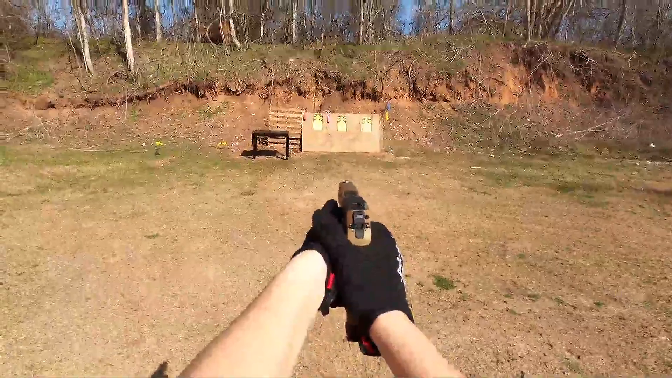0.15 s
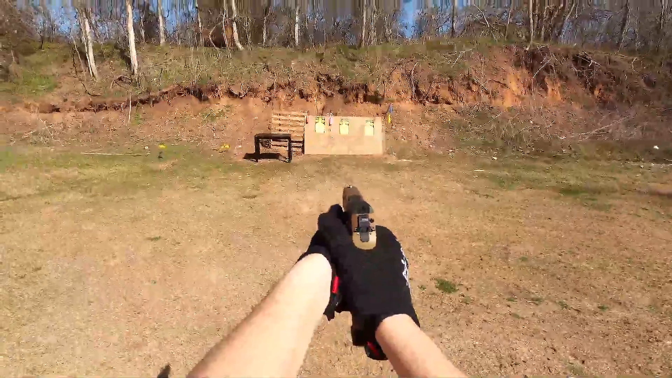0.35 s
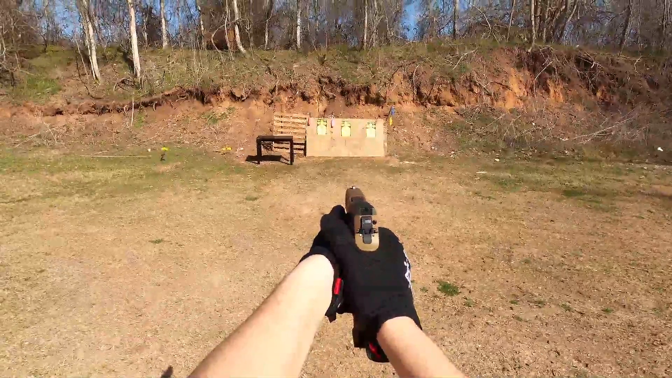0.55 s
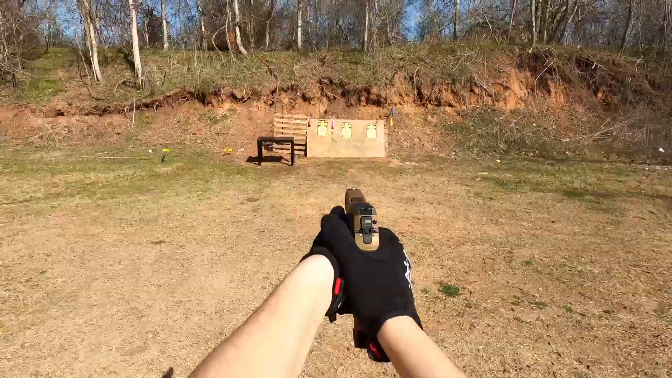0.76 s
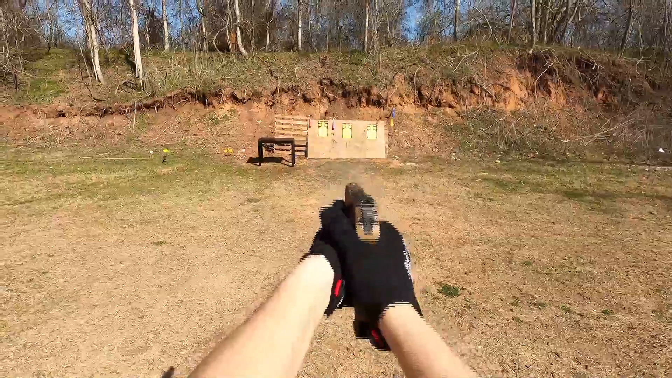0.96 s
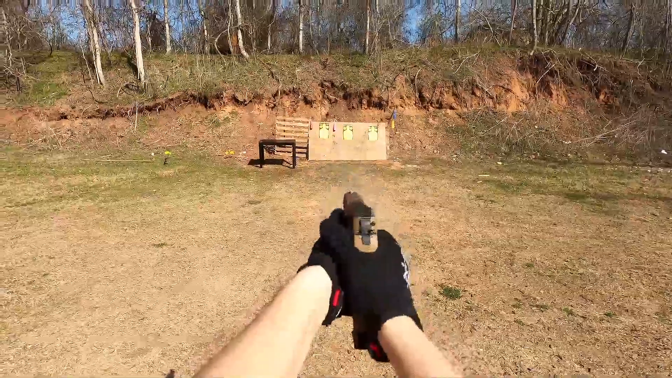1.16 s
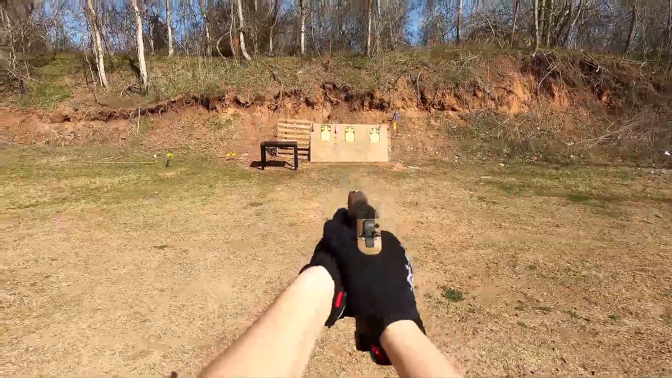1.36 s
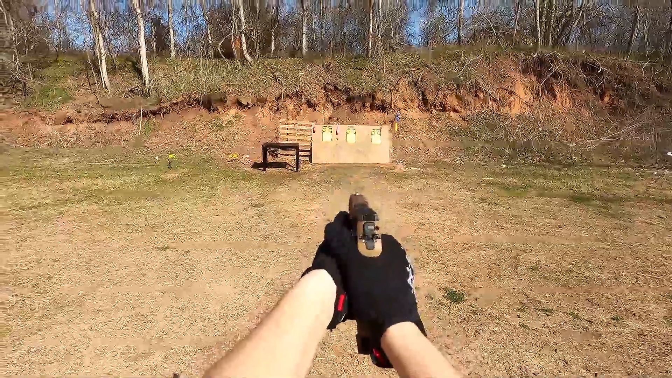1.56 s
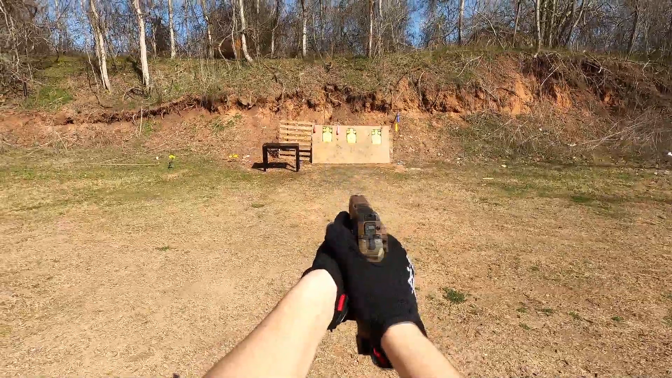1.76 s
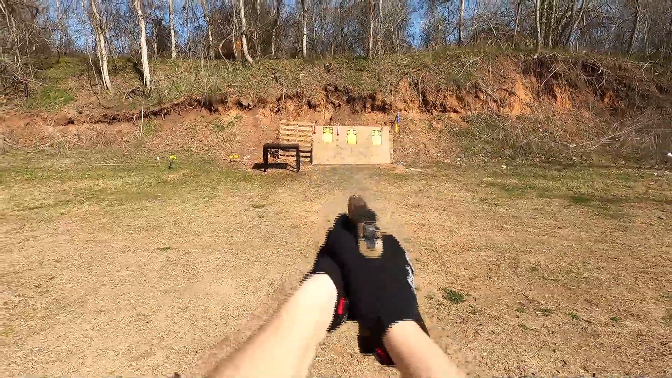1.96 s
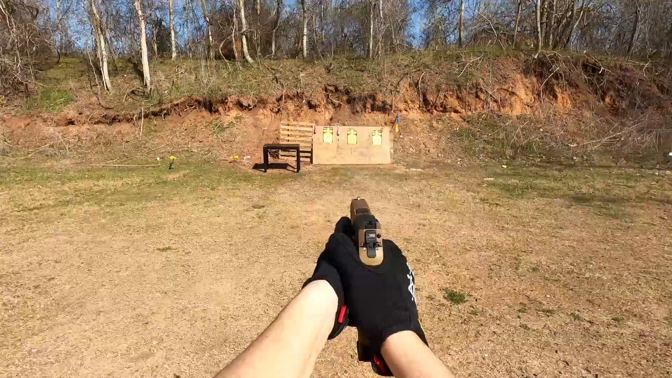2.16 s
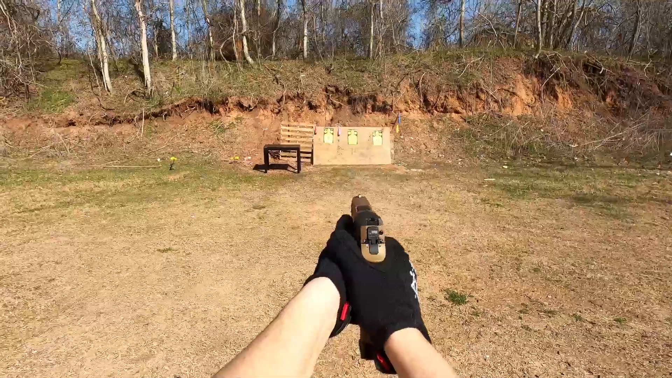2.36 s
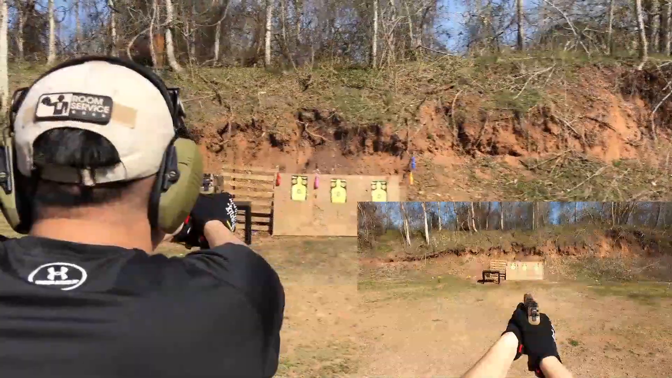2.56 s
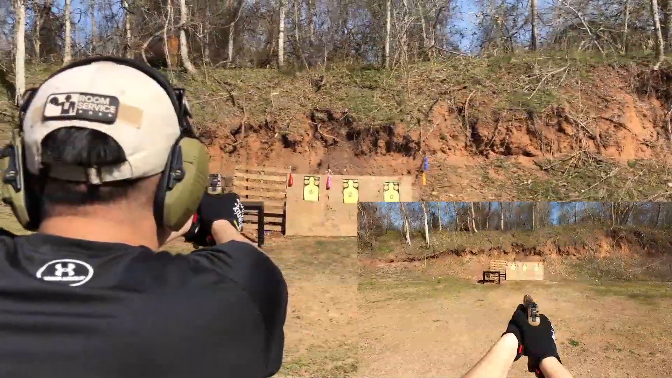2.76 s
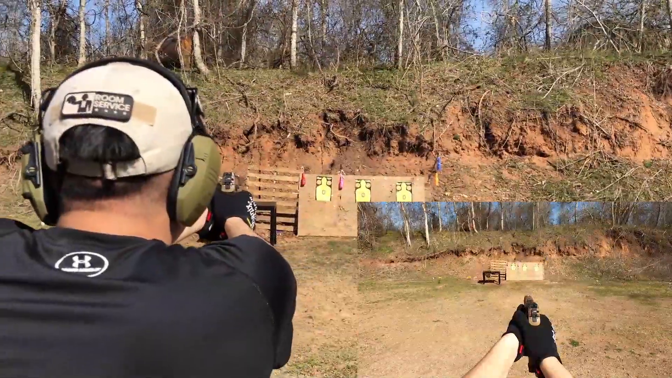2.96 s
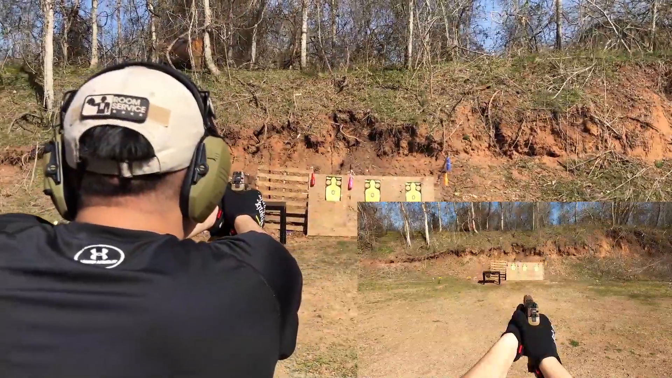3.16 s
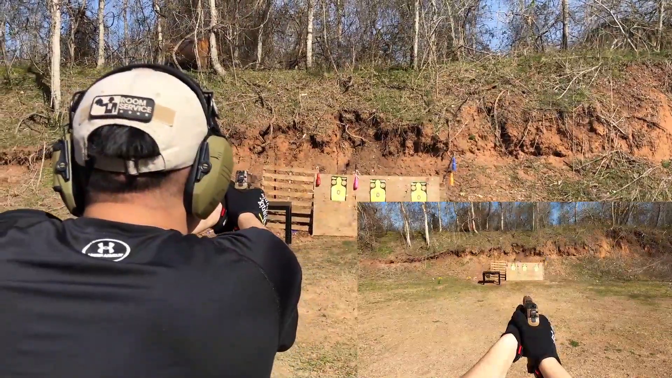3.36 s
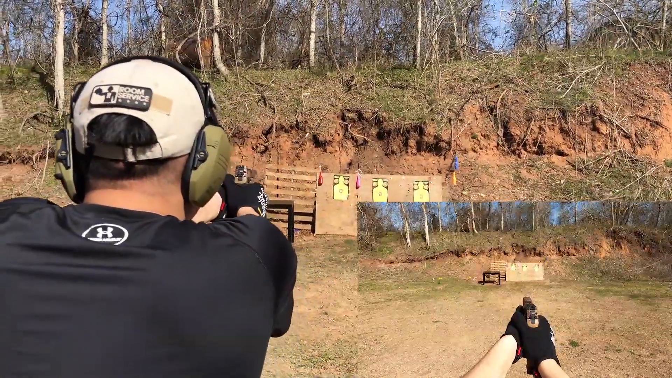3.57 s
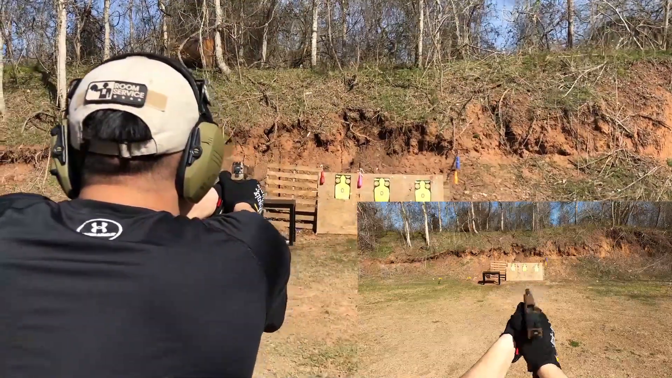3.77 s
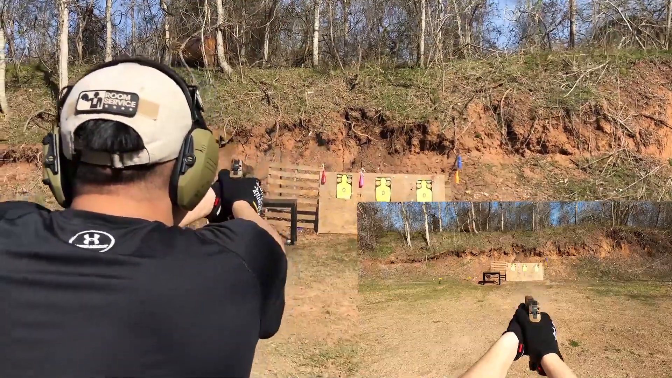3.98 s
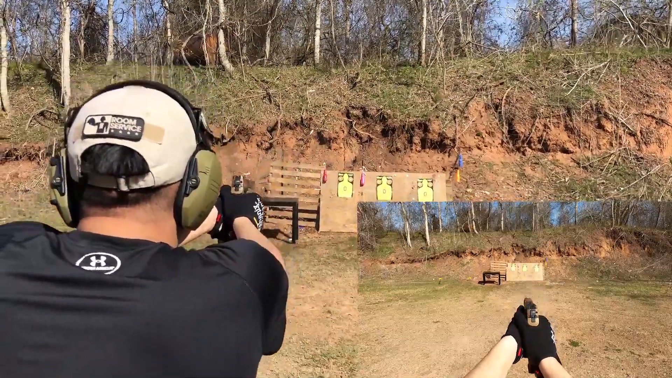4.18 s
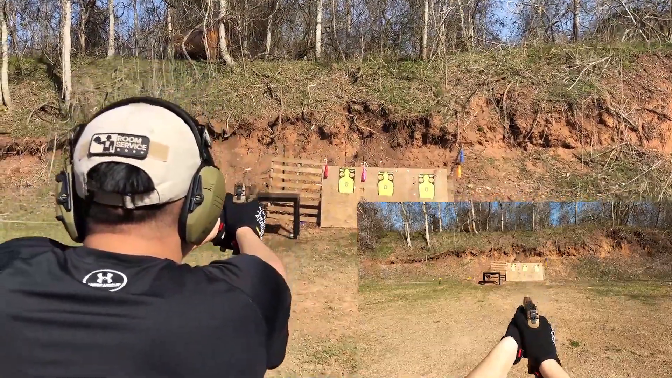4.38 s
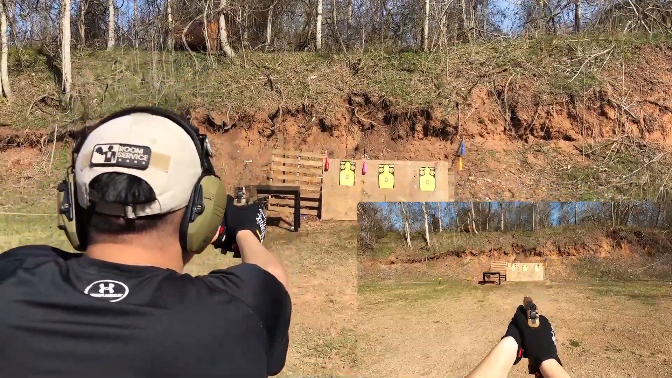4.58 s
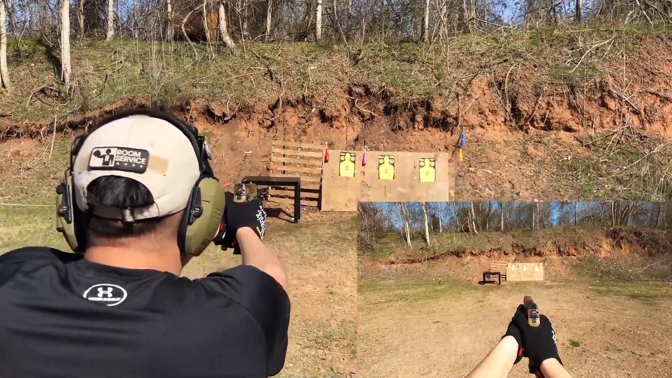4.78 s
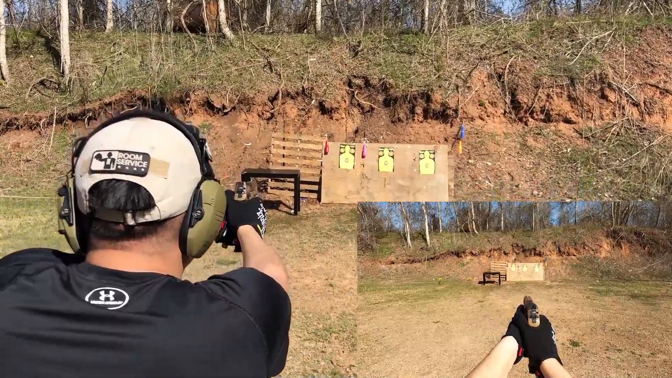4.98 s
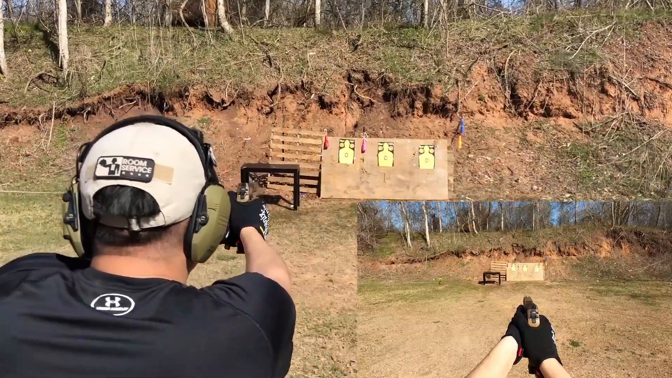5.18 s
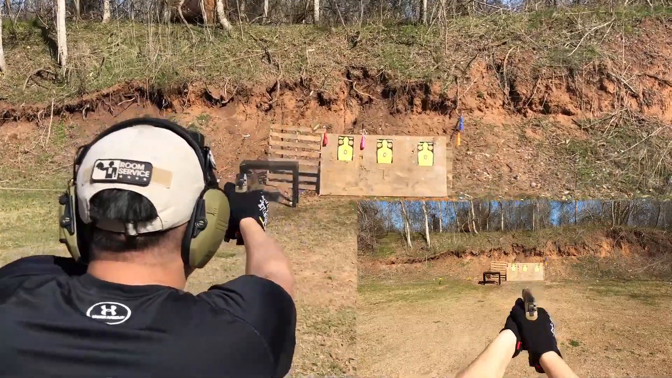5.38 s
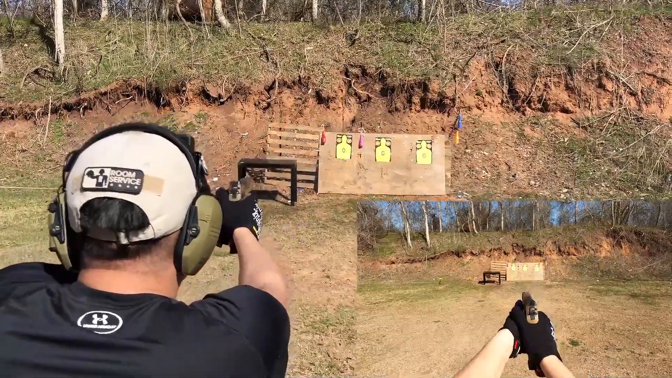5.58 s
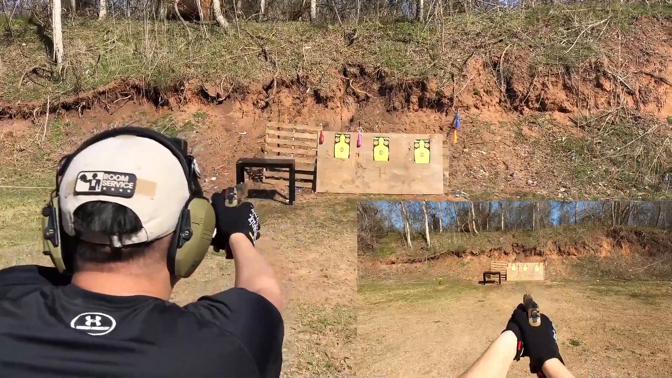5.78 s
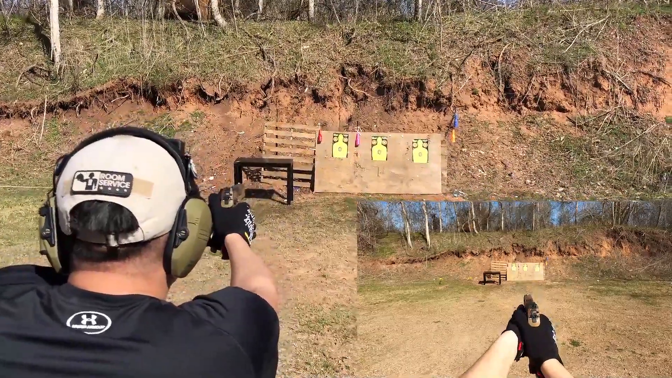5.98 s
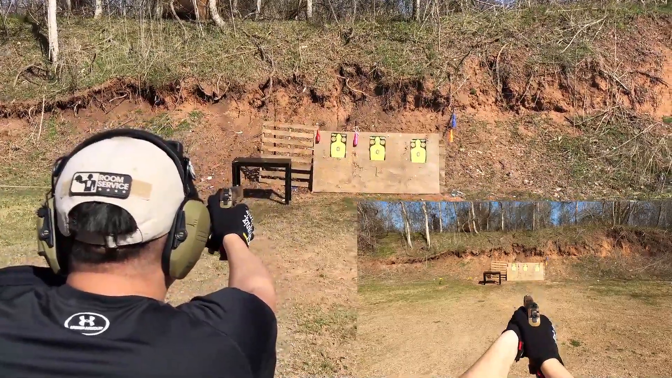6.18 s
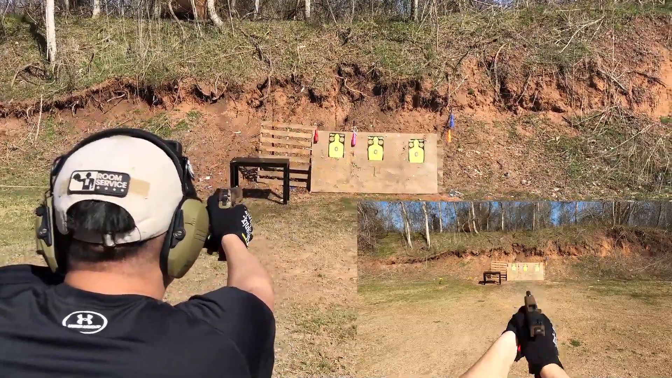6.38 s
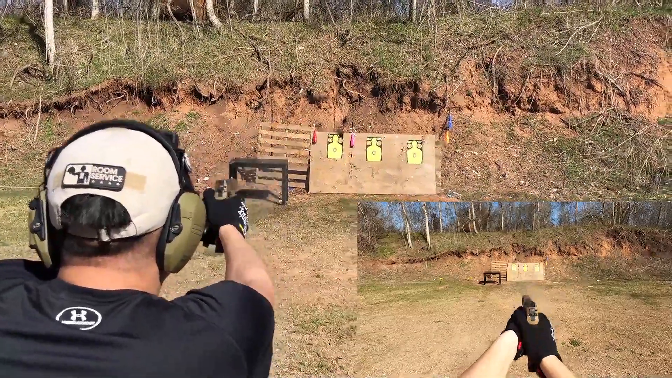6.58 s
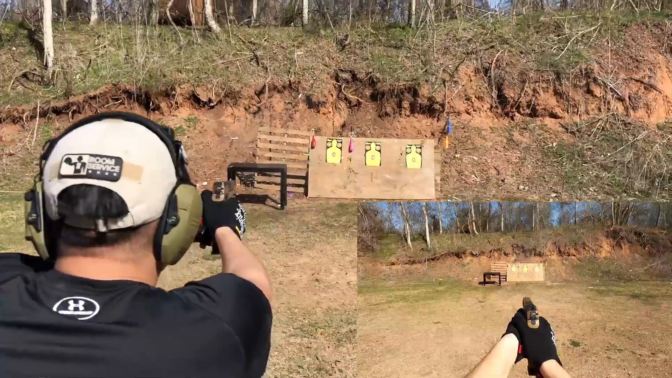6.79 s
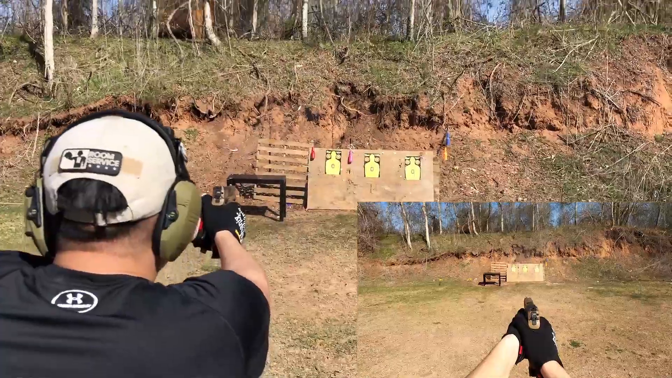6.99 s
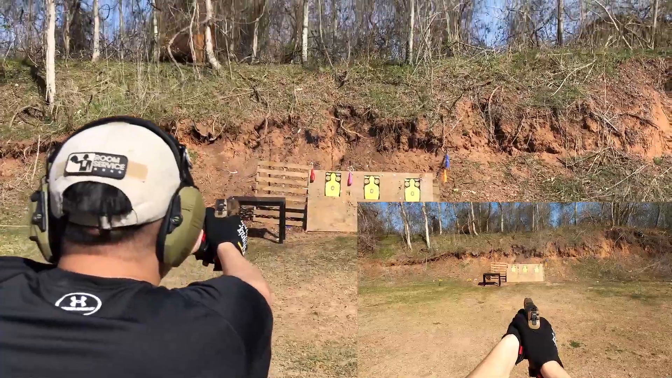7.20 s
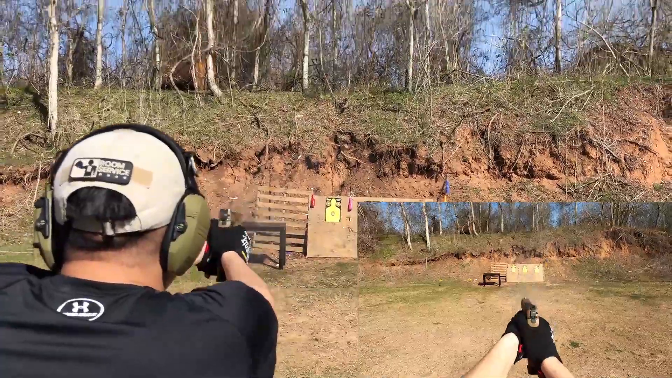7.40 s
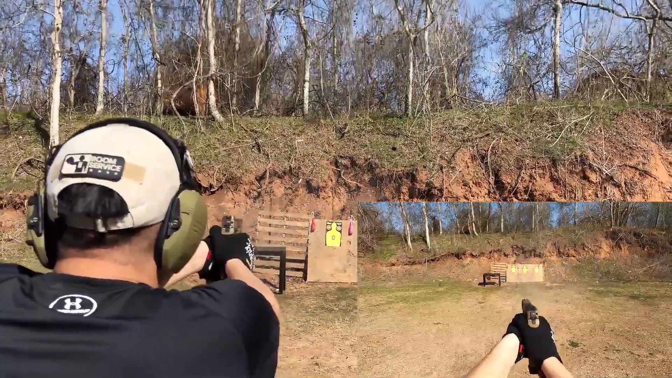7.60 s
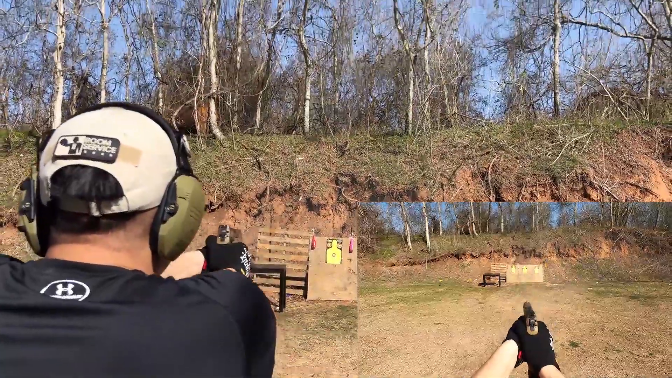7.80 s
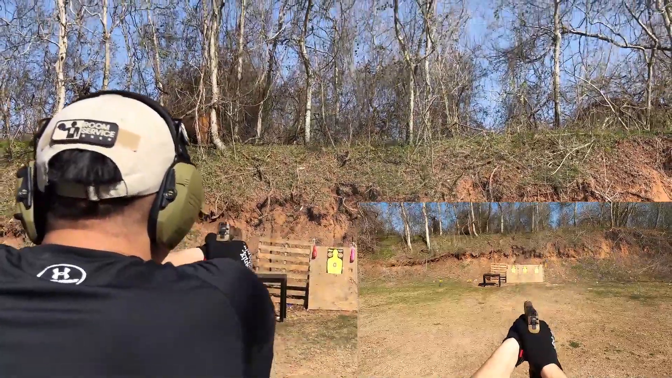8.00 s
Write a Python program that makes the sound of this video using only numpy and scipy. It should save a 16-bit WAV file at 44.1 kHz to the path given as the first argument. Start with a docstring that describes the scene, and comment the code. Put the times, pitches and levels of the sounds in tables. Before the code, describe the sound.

A quiet outdoor range in stereo at the shooter's head: clothes and leaves rustle, small close ticks cluster around 0.35-0.5 s and 0.9 s, with low lumpy wind and very faint throbbing insects. At 1.0 s a pistol fires, a brutally loud, clipped crack and thump with a rough brief swell before it, slapback from an earth bank about 60 ms later, and dense echoes darkening into the woods. A second shot follows at 2.0 s. At 2.5 s a brighter, nearly mono microphone behind joins, adding faint dry-grass hiss and another insect. Shots come at 3.9, 5.3 and 6.5 s, with wind buffets and tiny ticks between. Near 6.0-6.1 s a dull distant shot and a faint, high ringing case are barely heard. Wind swells around 7 s, then two rapid shots at 7.3 and 7.5 s, their echoes fading to the end at about 8 s.

```python
"""Clothes and leaves rustle over wind and insects, small ticks come close by, then a pistol fires seven shots.
The grass range is closed by an earth bank and woods: each shot is swinging pulses, hiss and scattered echoes.
A stereo microphone at the shooter's head hears it all; before the third shot a brighter, nearly mono one
behind him joins, with dry grass and another insect. A distant shot and a ringing case come late.
Wind is lumpy filtered noise, insects are throbbing noise bands; the loudest peaks clip hard."""
import sys
import numpy as np
from scipy import signal
from scipy.fft import rfft, irfft
from scipy.io import wavfile
from scipy.ndimage import uniform_filter1d

SR = 44100
rng = np.random.default_rng(int(sys.argv[2]) if len(sys.argv) > 2 else 0)


def digitize_waveform(pressure):
    """Quantize a signal to 16-bit integers and store it at the path in sys.argv[1].

    Rows of a 2-D input are taken as channels; values are limited to [-1, 1].
    """
    field = np.atleast_2d(pressure).T
    bounded = np.clip(field, -1, 1)
    quanta = np.round(bounded * 32767).astype(np.int16)
    wavfile.write(sys.argv[1], SR, quanta)


N = 355005  # samples

# pistol shots: t/s, head microphone/dB, rear microphone/dB, long tail/dB (added to the rear level),
# head turn (1 favours the right)
SHOTS = [(1.0172, -1, -62.5, 2, 0.12), (2.002, -3, -58.5, -0.5, -0.52), (3.8581, -4, -2.5, 1.5, .6),
         (5.301, -5.5, -1, 2, 0.83), (6.4809, -6, -3, 0.5, .8), (7.343, -4.5, 0.5, -4.5, 0.97),
         (7.5171, -4, -0.5, -1, 0.86)]
MIX_IN_S = 2.511  # the rear microphone joins


def gain_of(db):
    """Turns decibels into a factor."""
    return 10 ** (np.asarray(db) / 20)


def evened(x):
    """Scales to rms 1."""
    return x / np.sqrt(np.mean(x ** 2) + 1e-20)


def read(points, hz, axis=1):
    """Reads a table column on a log-frequency axis."""
    table = np.transpose(points)
    return np.interp(np.log(hz + 1), np.log(table[0] + 1), table[axis])


def curve(rows, t):
    """Joins a table by straight lines in time."""
    return np.interp(t, *np.transpose(rows))


def add(mix, s, sound):
    """Mixes a stereo sound in at a time."""
    part = mix[:, round(s * SR):][:, :sound.shape[-1]]
    part += sound[..., :part.shape[1]]


def coloured(x, points):
    """Filters by a spectrum."""
    size = x.shape[-1]
    gain = gain_of(read(points, np.fft.rfftfreq(size, 1 / SR)))
    return irfft(rfft(x) * gain, size)


def smoothed_twice(size, width):
    """Slow random drift at rms 1: noise through two moving averages."""
    once = uniform_filter1d(rng.standard_normal(size), width)
    return evened(uniform_filter1d(once, width))


def pair(size, alike):
    """Two noise channels with a given likeness, from a shared middle and an opposed side."""
    mid, side = rng.standard_normal((2, size))
    alike = np.clip(alike, 0, 1)
    return np.sqrt((1 + alike) / 2) * mid + np.sqrt((1 - alike) / 2) * side * np.array([[1], [-1]])


def trunks(size, alike, spread_db):
    """Noise in uneven lumps: single trunks and clods answer louder than their neighbours."""
    lumps = evened(uniform_filter1d(rng.standard_normal(size), 90))
    left, right = pair(size, alike)
    side = uniform_filter1d(left - right, size=5)  # the channels differ only below the treble
    stereo = (left + right) / 2 + .6 * side * np.array([[1], [-1]])
    return evened(stereo * gain_of(spread_db * lumps))


def since_shot(t):
    """Seconds since the latest shot, from the second on; 9 before that."""
    return np.min([np.where(t < s, 9, t - s) for s, *_ in SHOTS[1:]], axis=0)


def rustle():
    """Clothes and leaves before the first shot: lumpy noise, filtered and following a level curve."""
    # strength of the rustle: t/s, level/dB
    strength = [(0.0, -50.5), (0.134, -51.5), (0.33, -55.5), (.4, -52), (0.5, -53.5), (.58, -61.5),
                (0.69, -60.5), (0.88, -56)]
    # its spectrum: f/Hz, relative level/dB
    rustle_colour = [(90, -31), (150, -7.5), (250, -8), (450, -13.5), (800, -21.5), (1200, -15.5),
                     (1900, -29), (4300, -40.5), (6500, -46.5), (15000, -61)]
    t = np.arange(N) / SR
    noise = evened(coloured(trunks(N, 1.0, 3.3), rustle_colour))
    return noise * gain_of(curve(strength, t)) * (t < SHOTS[0][0])


def insects():
    """Narrow noise bands throb; two stop at the first shot, the third joins with the rear microphone."""
    # insect bands: f/Hz, width/Hz, throbs per s, depth 0-1, level/dB
    bands = [(8450, 450, 55, .9, -75.5), (9500, 750, 130, .3, -74), (9220, 450, 58, .4, -82)]
    hush_db, hush_s, waver_db = -22, .8, 2  # the third comes back slowly after each shot
    t = np.arange(N) / SR
    before = t < SHOTS[0][0]
    hush = hush_db * np.exp(-since_shot(t) / hush_s)
    rear = gain_of(hush + waver_db * smoothed_twice(N, 5000)) * (t > MIX_IN_S)
    out = np.zeros((2, N))
    for (hz, width, rate, depth, db), heard in zip(bands, [before, before, rear]):
        band = signal.butter(3, [hz - width / 2, hz + width / 2], "band", fs=SR, output="sos")
        throb = 1 + np.clip(depth, 0, 1) * np.cos(2 * np.pi * rate * t)
        out += gain_of(db) * heard * evened(signal.sosfilt(band, pair(N, .8)) * throb)
    return out


def wind():
    """A lumpy low rumble of filtered noise on the microphones, with a few stronger buffets."""
    # spectrum of the gusts: f/Hz, relative level/dB
    gust_colour = [(12, -21.5), (20, 1), (52, -7), (105, -6.5), (150, -17.5), (250, -29.5), (400, -43),
                   (900, -78.5)]
    # slow strength of the wind, before the lumps: t/s, level/dB
    strength = [(0, -59.5), (.35, -54), (.6, -65), (.85, -55.5), (1.7, -58), (2.9, -64.5), (3.6, -57),
                (4.5, -53.5), (4.95, -59), (5.8, -51.5), (6.2, -55), (7.0, -42.5), (7.3, -51), (8.05, -59)]
    # buffets on the microphones: peak t/s, level/dB, length/s
    buffets = [(0.366, -47.5, 0.039), (3.134, -49.5, 0.11), (3.335, -42.5, 0.04), (3.425, -45.5, 0.033),
               (3.74, -50, 0.14), (4.75, -44, 0.079), (5.064, -45, 0.08), (5.168, -44, 0.076),
               (5.24, -50, 0.045), (6.02, -43, 0.049), (6.307, -42.5, 0.073), (7.11, -40.5, 0.13)]
    lump_s, lumps_db = .05, 3.5
    t = np.arange(N) / SR
    lumps = smoothed_twice(N, round(lump_s * SR))
    level = gain_of(curve(strength, t) + lumps_db * lumps)
    level += sum(gain_of(db) * np.exp(-(2 * (t - s) / length) ** 2) for s, db, length in buffets)
    return evened(coloured(pair(N, 0.55), gust_colour)) * level


def tick(db, hz, t60, snap_db):
    """A soft noisy ring and a short wider snap, both resonant noise dying away."""
    t, noise = np.arange(6000) / SR, pair(6000, 0.99)
    narrow = signal.iirpeak(hz, 1.6, SR)
    wide = signal.iirpeak(min(1.8 * hz, 9000), .9, SR)
    ring = evened(signal.lfilter(*narrow, signal.lfilter(*narrow, noise))) * gain_of(-60 * t / t60)
    snap = evened(signal.lfilter(*wide, signal.lfilter(*wide, noise))) * np.exp(-t / 0.0012)
    soft_edge = np.minimum(t / 0.0013, 1)
    return gain_of(db) * (ring + gain_of(snap_db) * snap) * soft_edge


def ticks():
    """Small close ticks: each ring fades 60 dB in 70 swings, and thin ones snap harder."""
    # grip, clothes and small things in the grass: t/s, level/dB, f/Hz
    touches = [(.03, -47, 2100), (.126, -48.5, 1870), (.145, -55, 4000), (.275, -55, 3000),
               (.349, -37, 660), (.356, -38, 260), (.365, -38, 1100), (.378, -43, 1100), (.396, -46, 900),
               (.447, -48, 700), (.465, -50, 1100), (.494, -50, 1200), (.9, -42, 1250), (.922, -44, 450),
               (.927, -37, 1000), (2.511, -59, 4910), (2.915, -67, 4500), (3.276, -65, 6000),
               (3.317, -66, 7000), (3.348, -65, 5000), (3.577, -62, 9500), (4.26, -61, 7960),
               (4.67, -56, 6000), (4.8, -66, 5000), (4.899, -67, 5500), (5.024, -65, 6000),
               (5.144, -44, 2090), (6.094, -57, 5500)]
    ring_cycles = 70
    snap_db, snap_db_per_octave = -13.5, 7  # snap against ring at 1 kHz, and its rise
    out = np.zeros((2, N))
    for s, db, hz in touches:
        snap = snap_db + snap_db_per_octave * np.log2(hz / 1000)
        add(out, s, tick(db, hz, ring_cycles / hz, snap))
    return out


def swell(ring_hz, db, length_ms, tilt_db, ring_db, stutter_db):
    """Noise with uneven narrow peaks and a fuzzy ring grows up to the crack, with four bursts at even steps."""
    stutter_ms, stutter_decay_ms = 10.6, 1.4
    stutter_step_db = -8.5  # each earlier burst is weaker
    size = round(4.3 * stutter_ms * SR / 1000)
    hz = np.fft.rfftfreq(4096, 1 / SR)
    lead = np.arange(size, 0, -1) / SR * 1000  # ms left to the end of the swell
    peaks_db = 4 * evened(uniform_filter1d(rng.standard_normal(len(hz)), 8))
    slope_db = tilt_db * np.log2(1 + hz / 400) - 30 * (hz / 16000) ** 3
    noise = rfft(pair(4096, .93))
    away = (hz - ring_hz) / (30 + 0.05 * ring_hz)
    rough = evened(irfft(noise * gain_of(peaks_db + slope_db)))[:, :size]
    ring = evened(irfft(noise / (1 + away ** 4)))[:, :size]
    grow = np.sin(np.pi / 2 * np.clip(1 - lead / length_ms, 0, 1)) ** 4.1
    bursts = 0
    for k in range(4):  # the last burst first
        age = np.maximum((k + 1) * stutter_ms - lead, 0) / stutter_decay_ms
        bursts = bursts + gain_of(stutter_db + stutter_step_db * k) * np.e * age * np.exp(-age)
    return rough * (gain_of(db) * grow + bursts) + gain_of(ring_db) * ring * grow


def blast(ms, db, crest, growth, rise, decay, wobble):
    """A pressure jump heard as a falling sweep: treble first, each half swing longer than the last, none quite
    even."""
    age = np.maximum(ms, 1e-6)
    swing = np.cos(np.pi * np.log(age / crest) / np.log(growth) + wobble)
    return gain_of(db) * swing * (1 - np.exp(-(age / rise) ** 3)) * np.exp(-(age - rise) / decay)


def arrivals(delays, paths, hiss_colour, alike, turn):
    """The distinct paths of one shot, from 3 ms before it: a swing and a puff of hiss each."""
    size = 8000
    ms = np.arange(size) / SR * 1000 - 3
    hiss = evened(coloured(pair(size, alike), hiss_colour))
    wobble = 0.33 * smoothed_twice(size, 40)  # radians
    out = np.zeros((2, size))
    for at, (db, crest, growth, rise, decay, hiss_db, hiss_ms, right_db) in zip(delays, paths):
        side = turn * right_db * np.array([[-1], [1]])
        puff_age = ms - at - rise / 2 - hiss_ms
        puff = gain_of(hiss_db) * hiss * np.exp(-(puff_age / hiss_ms) ** 4)
        late = .014 * side  # ms: the louder side lags a little
        out += blast(ms - at - late, db + side, crest, growth, rise, decay, wobble) + puff
    return out


def head_arrivals(turn):
    """Blast and reflections reach the head at the delays of their path lengths."""
    # blast, ground, bullet strike, bank edge, bank face, target wall, two booms: t/ms after the shot
    delays = [-2.7, 5.0, 51.5, 58.2, 59.6, 82.6, 80, 112]
    # each path: relative level/dB, time to a crest/ms, growth per half swing (below 1: its inverse), rise/ms,
    # decay/ms, relative hiss/dB, hiss/ms, right gain and left loss at full turn/dB
    paths = [(7.5, 4.9, 1.5, 0.11, 3.1, -2.5, 2, 3), (3, 1.9, 1.8, 1.1, 4.7, -20.5, 1.7, 3.5),
             (-26, 1.3, 0.76, .5, 2.2, -25.5, 8.7, 0), (-8, 1.5, 2, 0.69, 3.8, -16, 0.47, 1.5),
             (4.5, 4.7, 2.1, 0.85, 4.2, -18, 1, 0.5), (-4.5, 4.9, 2.5, 6.9, 2.1, -24, 0.87, 1),
             (-11.5, 26, 1.09, 5.8, 18, -33, 5.5, -3.5), (-14, 28, 1.5, 4.7, 13, -36.5, 9.3, 3)]
    # colour of the hiss: f/Hz, relative level/dB
    hiss_colour = [(200, -2.5), (1500, 8.5), (4000, -5), (9000, -18), (16000, -32)]
    return arrivals(delays, paths, hiss_colour, .93, turn)


def rear_arrivals(turn):
    """The same shot farther back: later paths, with the same hiss in both channels."""
    # blast, ground, bullet strike, bank, target wall, far corner: t/ms after the shot
    delays = [13.2, 19.3, 65.5, 74.8, 92, 113]
    # each path: relative level/dB, time to a crest/ms, growth per half swing (below 1: its inverse), rise/ms,
    # decay/ms, relative hiss/dB, hiss/ms, right gain and left loss at full turn/dB
    paths = [(-7.5, 5.2, 1.7, .6, 9, -6.5, 1.6, 0.0015), (-3.5, 1.9, 1.3, 2.4, 1.9, -13.5, 0.82, 0.00024),
             (-13.5, 6.8, 0.76, 3.5, 1, -14, 1.2, 0), (-12, 3.7, 1.5, 1.1, 3.7, -13, 1.1, 0.011),
             (-1.5, 9, 1.09, 7.7, 3.5, -18, 3.2, 0.029), (-8, 5.7, 1.1, 5.3, 4, -23.5, 4, 0.006)]
    # colour of the crack: f/Hz, relative level/dB
    hiss_colour = [(200, -15), (1500, 0.5), (4000, 4.5), (9000, 0), (16000, -12)]
    return arrivals(delays, paths, hiss_colour, 1.0, turn)


def echo_level(groups, age):
    """Each group of echoes swells in and dies away; their powers add."""
    power = 0
    for s, db, rise, t60 in groups:
        late = np.maximum(age - s, 0)
        level = gain_of(db - 60 * late / t60) * (1 - np.exp(-(late / rise) ** 2))
        power = power + level ** 2
    return np.sqrt(power)


def scatter(source, groups, colour, db, tail_db, power):
    """Dense echoes whose treble and bass fade with the path, in patches; later ones follow the tail level."""
    patchy_db = 1.3
    hz, t, z = signal.stft(source, SR, nperseg=512, noverlap=384)
    start_db = read(colour, hz)[:, None]
    loss_db = read(colour, hz, axis=2)[:, None] * t ** power
    shape = gain_of(start_db - loss_db)
    shape /= np.sqrt(np.mean(shape[:, :1] ** 2) * len(hz) / 32)
    patches = rng.standard_normal(shape.T.shape).T
    patches = evened(uniform_filter1d(uniform_filter1d(patches, 6, 0), 20, 1))
    z = z * shape * gain_of(patchy_db * patches)
    out = signal.istft(z, SR, nperseg=512, noverlap=384)[1][..., :source.shape[-1]]
    age = np.arange(out.shape[-1]) / SR
    late = np.clip(age / 0.37, 0, 1)
    return 3 * out * echo_level(groups, age) * gain_of(db + (tail_db - db) * late)


def head_scatter(source, db, tail_db):
    """Ground and woods answer at the head in overlapping groups of dense echoes."""
    # muzzle smoke and ground, bank, near trees, hillside, far woods:
    # t/s after the shot, relative level/dB, rise/s, t60/s
    groups = [(0.00067, -11.5, 0.0036, 0.082), (.036, -12, .02, 0.19), (.085, -20, .025, .6),
              (.235, -19.5, .06, .7), (.14, -27.5, 0.033, 3.06)]
    # colour of the scatter: f/Hz, relative level at the start/dB, loss against 1 kHz after 1 s/dB
    colour = [(30, -27.5, 10), (100, 6.5, 20), (254, 2.5, 18), (510, -3.5, 0), (1100, -1.5, 4.5),
              (1600, -9.5, 9), (2200, -7.5, 17), (3000, -10.5, 25.5), (4300, -11.5, 43), (6000, -20.5, 50),
              (10100, -24, 88.5), (16000, -39, 117.5)]
    return scatter(source, groups, colour, db, tail_db, power=0.81)


def rear_scatter(source, db, tail_db):
    """Dense echoes at the rear microphone, with their own timing and brighter colour."""
    # groups of echoes: t/s after the shot, relative level/dB, rise/s, t60/s
    groups = [(.016, -10.5, .002, .09), (0.031, -6.5, 0.025, 0.33), (0.1, -6.5, 0.012, 0.34),
              (0.15, -23.5, 0.058, 0.74), (0.14, -32, 0.17, 1.4)]
    # colour of the scatter: f/Hz, relative level at the start/dB, loss against 1 kHz after 1 s/dB
    colour = [(30, -43, 8), (150, -17, 6.5), (395, -6, 6.5), (900, -0.5, 6), (1520, -9, 8),
              (2200, -5.5, 45), (3000, -11, 28), (4340, -11.5, 43.5), (6000, -15, 48), (10200, -15, 79),
              (16000, -23, 108.5)]
    return scatter(source, groups, colour, db, tail_db, power=0.87)


def bank_boom(source, db):
    """A low boom rolls along the bank: half a second of bass-heavy scatter."""
    # groups of echoes: t/s after the shot, relative level/dB, rise/s, t60/s
    groups = [(.062, -11, .025, 0.23), (.15, -47.5, 0.092, 0.2)]
    # colour of the boom: f/Hz, relative level at the start/dB, loss after 1 s/dB
    colour = [(30, -14, 3), (69, -5, 3.7), (139, -0.5, 3), (260, 0, 3.3), (430, 0, 2.1), (700, -28, 3),
              (2000, -67.5, 3)]
    return scatter(source[:, :SR // 2], groups, colour, db, db, power=0.77)


def pistol():
    """Every shot meets the same bank and trees, so most of its scatter at the head repeats."""
    # a rough swell stutters up to each crack: level/dB, length/ms, treble tilt/dB per octave,
    # ring level/dB, last burst level/dB
    swells = [(-8, 49, -2.5, -9.5, -11.5), (-10.5, 37, -4.5, -17, -15), (-13, 44, -5.5, -20, -10),
              (-14, 42, -5.5, -25, -11), (-20.5, 42, -5, -12.5, -16.5), (-25.5, 34.5, -6, -19.5, -22),
              (-24, 26, -2, -20, -20.5)]
    # ring of each swell: f/Hz
    swell_ring_hz = [135, 260, 520, 1300, 920, 900, 900]
    same_site, fresh = .85, .45  # shares of repeated and new scatter at the head
    head_drop_db, rear_lumps_db = -1.5, 3
    out, size = np.zeros((2, N)), round(2.4 * SR)
    head_site, rear_site = trunks(size, 0.98, 1.5), trunks(size, 0.97, rear_lumps_db)
    for (s, head_db, rear_db, tail_db, turn), run_up, ring_hz in zip(SHOTS, swells, swell_ring_hz):
        head = evened(same_site * head_site + fresh * trunks(size, 0.82, 0.85))
        rear = evened(0.58 * rear_site + 0.84 * trunks(size, 1.0, rear_lumps_db))
        add(out, s, head_scatter(head, head_db, tail_db))
        add(out, s, rear_scatter(rear, rear_db, rear_db + tail_db))
        add(out, s, bank_boom(head, head_db))
        near = gain_of(head_db) * head_arrivals(turn)
        behind = gain_of(rear_db) * rear_arrivals(turn)
        add(out, s - .003, near + behind)  # the arrivals start 3 ms early
        rough = swell(ring_hz, *run_up)
        add(out, s - .002 - rough.shape[1] / SR, rough)
        if s == SHOTS[1][0]:  # this tail still sounds, and drops as the rear microphone joins
            out[:, round(MIX_IN_S * SR):] *= gain_of(head_drop_db)
    return out


def grass():
    """Dry grass at the rear microphone: filtered hiss with random crackles that decay exponentially."""
    # spectrum of the grass: f/Hz, relative level/dB
    grass_colour = [(300, -6.5), (1500, -2.5), (5000, -4.5), (9000, -7.5), (15000, -19)]
    grass_db, crackles_per_s, crackle_db = -74.5, 21, -81.5
    hush_db, hush_s = -18.5, .5  # the hiss comes back slowly after each shot
    t = np.arange(N) / SR
    sizes = gain_of(2.7 * np.minimum(rng.exponential(1, N), 3.5))
    starts = sizes * (rng.random(N) < crackles_per_s / SR)
    crackle = signal.oaconvolve(starts, np.exp(-np.arange(1000) / 180))[:N]
    level = gain_of(grass_db) + gain_of(crackle_db) * crackle
    behind = gain_of(hush_db * np.exp(-since_shot(t) / hush_s)) * (t > MIX_IN_S)
    return evened(coloured(pair(N, 0.25), grass_colour)) * level * behind


def far_shots():
    """Another bay, heard through the trees, dull and wet: only a soft-edged tail of noise arrives."""
    # distant shots: t/s, relative level/dB, t60/s
    reports = [(6.012, -35.5, 5.5)]
    # their spectrum: f/Hz, relative level/dB
    far_colour = [(88, -42), (150, 1), (282, -11.5), (385, -1.5), (971, 1.5), (1520, -5), (6000, -54),
                  (7800, -91.5), (13200, -120)]
    out, t = np.zeros((2, N)), np.arange(SR) / SR
    for s, db, t60 in reports:
        tail = np.exp(-t / 0.0078) + .5 * gain_of(-60 * t / t60)
        fade = gain_of(db) * tail * np.minimum(t / 0.0036, 1)
        add(out, s, fade * evened(coloured(pair(SR, 0.73), far_colour)))
    return out


def spent_case():
    """A spent case rings as one high decaying sine."""
    # the ring: t/s, peak level/dB, f/Hz, t60/s
    case_ring = (6.096, -70, 10600, .15)
    s, db, hz, t60 = case_ring
    out, t = np.zeros((2, N)), np.arange(6000) / SR
    add(out, s, gain_of(db - 60 * t / t60) * np.sin(2 * np.pi * hz * t))
    return out


def scene():
    """All sources at the microphones."""
    return rustle() + insects() + wind() + ticks() + pistol() + grass() + far_shots() + spent_case()


def low_pass(x):
    """Removes everything above the highest recorded frequency."""
    return signal.sosfilt(signal.butter(12, 16110, fs=SR, output="sos"), x)


def record(dry):
    """The overloaded microphone mix clips hard at full scale."""
    return low_pass(np.clip(dry, -1, 1))


dry = scene()
out = record(dry)
digitize_waveform(out)
```